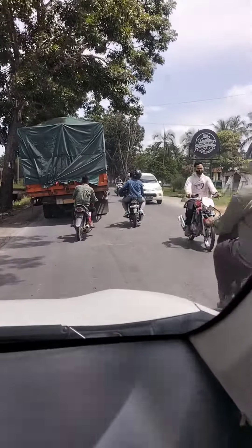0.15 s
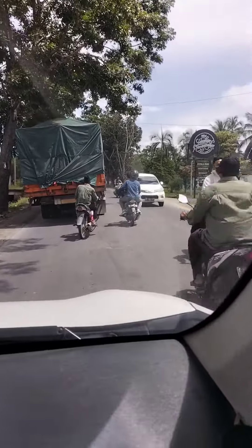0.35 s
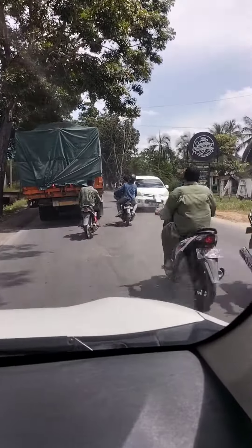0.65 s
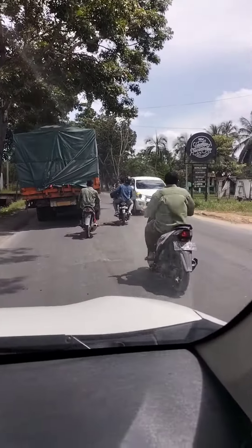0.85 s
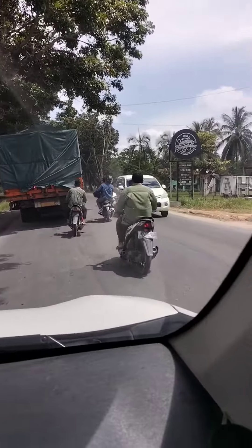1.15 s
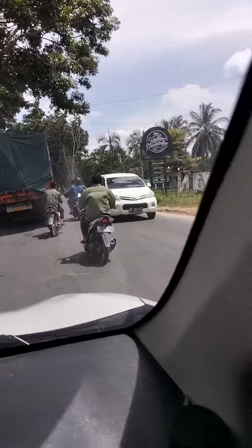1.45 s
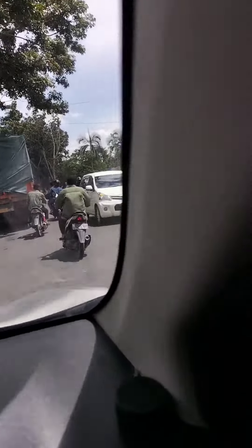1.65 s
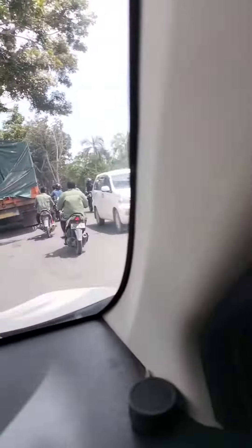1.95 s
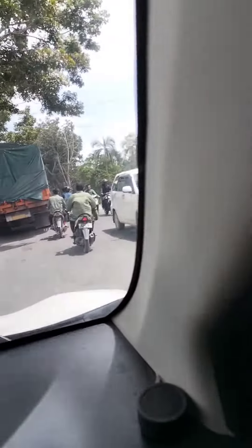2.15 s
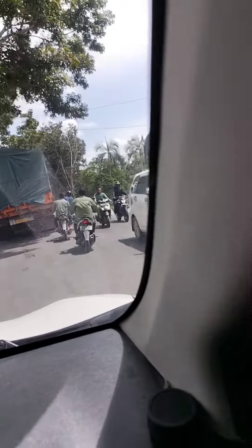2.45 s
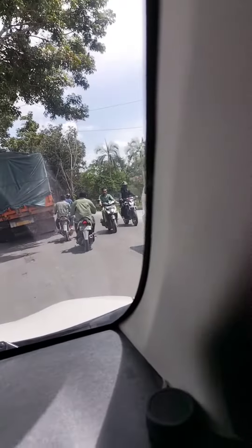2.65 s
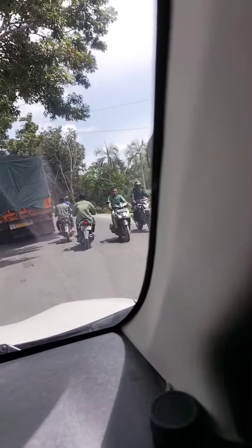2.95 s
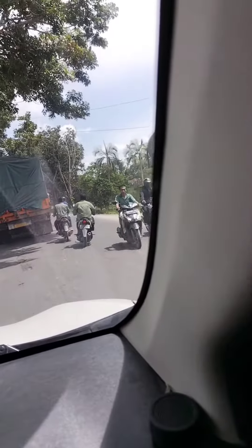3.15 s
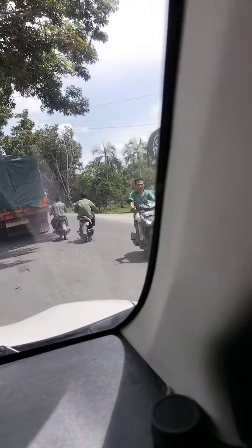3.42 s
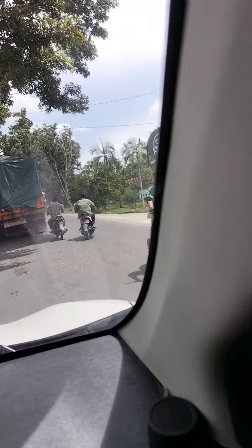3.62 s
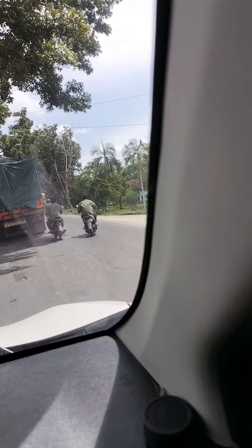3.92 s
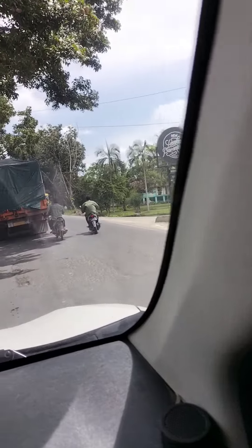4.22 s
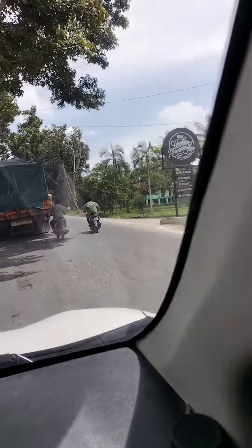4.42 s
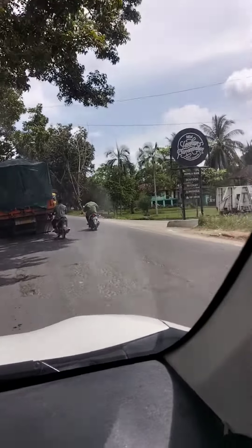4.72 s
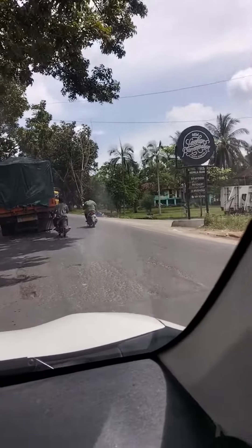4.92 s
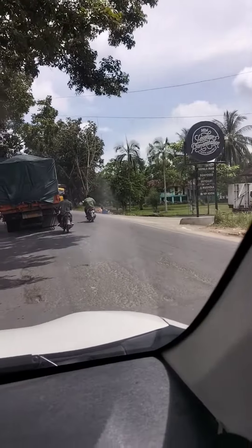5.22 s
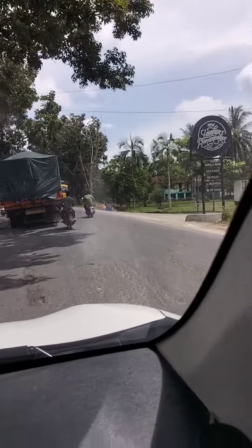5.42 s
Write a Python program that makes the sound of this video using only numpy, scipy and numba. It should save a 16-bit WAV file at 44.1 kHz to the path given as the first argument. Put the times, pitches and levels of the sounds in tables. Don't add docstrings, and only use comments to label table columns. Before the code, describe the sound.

A close phone microphone in the small, dull cabin of an idling car, windows shut. Soft low rumble and faint tyre hiss run throughout, with a barely felt idle. At 0 s a tiny metallic jingle chatters for a tenth of a second. A motorcycle's boomy, pulsing drone sags slightly, then revs up from about 0.6 s, and is strongest between 1.2 and 2.7 s, its pitch dropping around 2 s. A scooter's dry, fast, buzzing panel rattle swells at 1.1 s, peaks at 1.3-1.9 s and cuts away quickly, with road roar rising alongside. Plastic ticks fall at 0.67, 1.37 and 1.5 s; stronger clicks at 1.67 and 1.98 s, then a hard hollow snap with a small creak at 2.55 s. Small clicks cluster at 3.43 s while the drone weakens and wavers. A very loud click hits at 4.6 s. A second, slower scooter rattle builds from 4.4 s, peaking near 5.2 s; the motorcycle drone climbs, then fades by 5.5 s.

```python
import sys
import numpy as np
from scipy import signal
from scipy.fft import rfft, irfft
from scipy.io import wavfile
from scipy.ndimage import uniform_filter1d
from numba import njit

SR = 44100
rng = np.random.default_rng(int(sys.argv[2]) if len(sys.argv) > 2 else 0)


def rack_gain(trim_db):
    fader = np.asarray(trim_db, float)
    return 10 ** (fader / 20)


def log_audio(samples):
    frames = np.atleast_2d(samples).T
    limited = np.clip(frames, -1, 1)
    pcm = np.round(limited * 32767).astype(np.int16)
    wavfile.write(sys.argv[1], SR, pcm)


N = 245637
T = np.arange(N) / SR


def unit(x):
    return x / np.sqrt(np.mean(x ** 2))


def peak(x):
    return x / np.max(np.abs(x))


def columns(table):
    s, *rest = np.transpose(table)
    return [np.interp(T, s, column) for column in rest]


def bell(x, centre, spread):
    return np.exp(-.5 * ((x - centre) / spread) ** 2)


def swells(table):
    return sum(height * bell(T, s, spread) for s, spread, height in table)


@njit
def svf(x, hz, width):
    y, b, l = np.empty(len(x)), 0., 0.
    for i in range(len(x)):
        g, k = np.tan(np.pi * hz[i] / SR), width / hz[i]
        v = (b + g * (x[i] - l)) / (1 + g * (g + k))
        b, l, y[i] = 2 * v - b, l + 2 * g * v, k * v
    return y


def band(x, hz, width_hz):
    return svf(x, np.full(len(x), 1. * hz), 1. * width_hz)


def walk(rate):
    k = int(SR / rate)
    held = np.repeat(rng.standard_normal(N // k + 1), k)
    return 1.3 * uniform_filter1d(uniform_filter1d(held, k), k)[:N]


def turns(hz, firing_s):
    count = np.cumsum(hz) / SR
    count = count - count[int(firing_s * SR)]
    return count - np.floor(count[0])


def response(colour, size):
    f = np.maximum(np.arange(size // 2 + 1) * SR / size, 1)
    knots, db = np.transpose(colour)
    cep = irfft(np.interp(np.log(f), np.log(knots), db) * np.log(10) / 20, size)
    cep[1:size // 2] *= 2
    cep[size // 2 + 1:] = 0
    return irfft(np.exp(rfft(cep)), size)


def motorcycle():
    # t/s, firing rate f/Hz
    throttle = [(0.0, 17.24), (0.5, 16.76), (0.8, 19.38), (1.09, 22.58), (1.25, 23.4), (1.58, 24.07),
                (1.72, 23.74), (2.14, 19.73), (2.47, 19.77), (2.71, 21.0), (3.13, 22.22), (3.46, 21.54),
                (3.85, 21.8), (4.3, 23.36), (4.65, 23.07), (4.89, 24.09), (5.1, 25.15), (5.57, 25.96)]
    # t/s, cabin level/dB, bearing (-1 beside to 1 ahead), exhaust bark level/dB
    path = [(0, -30, -1.1, -66.5), (.55, -32, -1.6, -43.5), (.94, -30, -1.15, -52.5), (1.22, -23, -.7, -39),
            (1.55, -26, -0.85, -39), (1.78, -22, -0.017, -43.5), (2.09, -24, -0.56, -42.5),
            (2.22, -26.5, -0.077, -40.5), (2.42, -24, -0.43, -44), (2.68, -26, 0.16, -41),
            (2.93, -35, 0.82, -44.5), (3.1, -27, 0.37, -48.5), (3.45, -36, -0.94, -42),
            (3.88, -36, -0.15, -40), (4.45, -36.5, 0.36, -53), (4.8, -29, 0.022, -46),
            (4.98, -36, 0.041, -43.5), (5.27, -31, -0.3, -43), (5.57, -47.5, -0.35, -57)]
    # f/Hz, spread/Hz
    cabin = [
        (165, 16),
        (127, 20),
        (198, 17),
    ]
    # t/s, spread/s, gain
    second_near = [(.85, 0.21, 2.56), (2.1, 0.56, 1.4), (3.2, 0.36, .5), (5, 0.081, 7.8)]
    # t/s, spread/s, level/dB
    low_shifts = [(.35, 0.43, -6.5), (4, 0.4, 3.5), (5.3, 0.22, -5)]
    # t/s, spread/s, phase/rad
    scrambles = [(.4, 0.28, 0.54), (1.3, 0.2, 0.5), (2.2, 0.063, 0.58), (2.62, 0.23, 2.4),
                 (3.72, 0.07, 0.93), (4.45, 0.28, 0.91), (5.2, 0.29, 1.5)]
    # t/s, spread/s, added share
    echoes = [
        (2.5, 0.094, 0.31),
        (3.7, 0.11, 0.4),
        (4.4, 0.17, 0.44),
        (5.251, .15, -0.49),
    ]
    # t/s, spread/s, f/Hz, level/dB
    glints = [(.3, 0.54, 260, 14), (.1, 0.2, 190, -7), (0.69, 0.21, 284, 5), (1.1, .12, 322, 4.5),
              (1.35, .2, 260, 6), (1.3, 0.17, 1200, -4), (1.3, 0.13, 440, 7), (2, .1, 140, 3),
              (2.1, 0.064, 174, 1.5), (2.6, 0.13, 241, 5), (2.84, 0.14, 254, 7), (3.6, .25, 205, 5.5),
              (2.89, .12, 165, -5), (2.3, .15, 260, 6.5), (2.3, 0.22, 260, -6), (3.8, 0.072, 272, 3.5),
              (3.9, .2, 200, -1.5), (4.1, .2, 100, -7.5), (4.4, 0.21, 182, 3), (4.1, .15, 120, -6),
              (5.2, 0.071, 87, 12.5), (4.85, .1, 166, 3.5), (4.95, 0.09, 313, 3), (5.05, .1, 292, 10),
              (5.12, 0.067, 318, 5.5), (1.8, .08, 356, 5.5), (2.23, .12, 180, 4), (3.95, 0.11, 250, -4.5),
              (4.5, .3, 110, -5.5), (3.7, .2, 410, 6.5), (4.4, .2, 380, 5.5), (5.25, .15, 332, -5.5),
              (5.2, 0.18, 178, 2), (2.6, .15, 165, 1)]

    (hz,), (boom_db, bearing, bark_db) = columns(throttle), columns(path)
    second_share = 0.086 + swells(second_near)
    low_shift_db, scramble, echo = swells(low_shifts), swells(scrambles), 0.055 + swells(echoes)

    def mode_db(usual_db, follow, db_per_bearing):
        return usual_db + (follow - 1) * (boom_db + 30) + db_per_bearing * bearing

    low_db = mode_db(-9.5, 0.45, -2.5) + low_shift_db
    upper_db = mode_db(-13.5, 0.72, 9)
    second_db = mode_db(-23, 1.2, 2.2)
    cycles = turns(hz, 1.734) + .004 * walk(20)
    slip = 0.17 + 0.032 * T
    coarse = T[::256]
    out = 0
    for order in range(3, 24):
        f = order * hz
        boom, low, upper = (bell(f, *mode) for mode in cabin)
        bark = bell(f, 12.34 * hz, 18) + rack_gain(-11.5) * bell(f, 367, 110)
        gain = boom + rack_gain(low_db) * low + rack_gain(upper_db) * upper
        gain = gain + rack_gain(bark_db - boom_db - 5.5) * bark
        gain = gain + rack_gain(second_db) * bell(f, 327.3, 15.2) * second_share
        glint_db = sum(db * bell(coarse, s, spread) * bell(f[::256], at_hz, 13)
                       for s, spread, at_hz, db in glints)
        gain = gain * rack_gain(np.interp(T, coarse, glint_db))
        gain = gain * (1 + echo * (-1) ** order) / np.sqrt(1 + echo ** 2)
        lag = 1.2 * np.arctan((f - cabin[0][0]) / 15)
        fading = rack_gain((1.3 + .06 * order) * walk(7))
        phase = 2 * np.pi * order * cycles - lag + scramble * (order % 2) + slip * walk(2.5)
        out = out + gain * fading * np.cos(phase)
    return rack_gain(boom_db + 1.2 * walk(13)) * out * np.sqrt(hz / 22)


def scooter(engine, passing, panels, shade, jolts):
    firing_s, rate, gain = engine
    start, end, top_db, approach, leaving = passing
    cycles = turns(np.clip(rate + gain * (T - firing_s), 20, 36), firing_s)
    out = 0
    for hz, width, db in panels:
        late = cycles + 1 - .08 * rng.random()
        part, turn = late % 1, late.astype(int)
        shake = np.exp(-part / .22) * np.minimum(part / .05, 1) + .13
        luck_db, detune = np.clip(rng.standard_normal((400, 2)), -2, 1.4).T * [[2.6], [.015]]
        centre = hz * (1 + detune[turn])
        blows = shake * rack_gain(luck_db[turn]) * rng.standard_normal(N)
        ring = svf(svf(blows, centre, 1.3 * width), centre, 500.)
        shade_db = shade * max(np.log2(hz / 4180), 0) * np.maximum(T - end + 0.15, 0)
        jolt_db = sum(lift * bell(T, s, .013) for s, at_hz, lift in jolts
                      if abs(np.log2(hz / at_hz)) < .06)
        out = out + rack_gain(db + jolt_db - np.minimum(shade_db, 20)) * unit(ring)
    treble_cut = signal.butter(4, 6200, fs=SR, output="sos")
    air = band(band(out, 10500, 2500), 10500, 2500)
    out = signal.sosfilt(treble_cut, out) + rack_gain(-1) * air
    level_db = top_db - approach * np.maximum(start - T, 0) - leaving * np.maximum(T - end, 0)
    return rack_gain(level_db) * out / 2


def scooters():
    # time of one firing t/s, firing rate f/Hz, gain of rate/(Hz per s)
    engines = [
        (1.5745, 31, 5.6),
        (5.179, 25, 1.5),
    ]
    # alongside from t/s, to t/s, rattle level/dB, approach/(dB per s), leaving/(dB per s)
    passes = [
        (1.342, 1.933, -47, 35.5, 54.5),
        (5.154, 5.289, -47, 14.5, 68),
    ]
    # f/Hz, width/Hz, level/dB
    panels = [
        [(1850, 60, -3), (2150, 80, -12), (2480, 70, -8), (3400, 150, -8), (3850, 130, 0), (4200, 140, 0),
         (4750, 120, 1), (5000, 120, -5), (5600, 250, -16)],
        [(2420, 110, -5), (2750, 90, -2), (3150, 130, -8), (3550, 120, -3), (3950, 130, 0), (4300, 130, -4),
         (4750, 140, -5), (5500, 250, -14), (6200, 300, -20)],
    ]
    # t/s, f/Hz, level/dB
    first_jolts = [(1.06, 2480, 13), (1.075, 1850, 6), (1.15, 1850, 7.5), (1.19, 2480, 4), (1.22, 1850, 6),
                   (1.252, 1850, 4), (1.355, 1850, 8.5), (1.43, 1850, -5), (1.49, 1850, 4.5),
                   (1.44, 2480, 6), (1.49, 2480, 15), (1.65, 1850, -11), (1.71, 1850, -9),
                   (1.805, 2480, -10), (1.837, 2480, -8), (1.89, 2480, -13.5), (1.145, 3850, -7.5),
                   (1.185, 4750, 1), (1.25, 4200, 5), (1.32, 3850, 7), (1.32, 4750, -2), (1.355, 4200, 4.5),
                   (1.42, 4200, 5), (1.42, 3400, 2), (1.585, 4200, 5), (1.585, 4750, 7), (1.615, 4750, 6),
                   (1.647, 4750, 8), (1.712, 4750, 4), (1.775, 4750, 5), (1.806, 4750, 9.5),
                   (1.745, 3850, 3.5), (1.87, 3850, 1), (1.92, 3850, 5), (2.08, 3850, 1),
                   (2.107, 3850, 9.5)]
    # t/s, f/Hz, level/dB
    second_jolts = [(4.44, 3550, 12), (4.44, 2420, 10), (4.483, 3550, 4), (4.48, 5500, 22),
                    (4.515, 4750, 11), (4.555, 2750, 14), (4.615, 3950, 12.5), (4.652, 2420, 12),
                    (4.7, 2750, 9), (4.74, 2420, 6.5), (4.865, 2750, 0.5), (4.99, 2750, 10),
                    (5.03, 2420, 9.5), (5.03, 4750, -3), (5.072, 2420, 6.5), (5.075, 3950, 3.5),
                    (5.112, 4300, 3), (5.15, 2420, 7.5), (5.15, 4300, 5.5), (5.23, 4750, 5.5),
                    (5.27, 3550, 6), (5.27, 2420, 1.5), (5.31, 4300, 7), (5.31, 4750, 8.5),
                    (5.35, 4300, 3.5), (5.39, 3550, 8)]
    return sum(map(scooter, engines, passes, panels, [397.5, -6.5], [first_jolts, second_jolts]))


def clicks():
    # t/s, peak level/dB, knock minus tick level/dB, top minus tick level/dB, tick centre f/Hz
    struck = [(0.6669, -36, 5.5, -48, 2750), (0.685, -60, -1, -27, 3660), (1.37, -30.5, 3.5, -55.5, 4100),
              (1.38, -35.5, 13, -53, 4200), (1.667, -16.5, -11, -18.5, 4260),
              (1.9823, -13.5, -14, -45, 4330), (2.368, -43, 7, -14, 3830), (2.509, -28.5, -2, -36, 3820),
              (2.61, -43, 7.5, -46, 4220), (2.7077, -30.5, -35.5, -51, 3930), (3.43, -35.5, -25, -14, 2980),
              (3.4287, -32, -21, -18, 5200), (3.435, -41, -28, -20, 3900), (3.432, -26.5, -17, -20, 5100),
              (3.4338, -37, -24, -15, 5240), (4.5944, -5, -24, -13.5, 3500), (5.2539, -34.5, -1, -29, 3510)]
    # t/s, peak level/dB, top minus tick level/dB, air minus top level/dB
    skin = [(0.0002, -45.5, -0.5, -6), (0.3361, -65, 9, -22.5), (0.5242, -60.5, 10, -19),
            (1.497, -36.5, -1.5, -18), (1.529, -31, -4, -21), (1.553, -35, 2, -17), (1.819, -58, 2.5, -7),
            (2.018, -56, 8, -25), (2.1833, -54.5, 4.5, -26.5), (3.5185, -63, 7.5, -20.5),
            (4.631, -60, 2, 0), (4.692, -57, 3.5, -10)]
    # f/Hz, level/dB per Hz
    tick_colour = [(290, -59), (500, -11), (1270, 11), (1900, -1), (2630, 2), (3790, -2.5), (4080, 1.5),
                   (4670, -9), (6060, -8.5), (7880, -44.5), (13300, -120)]
    size = 2048
    out, t = np.zeros(N + size), np.arange(size) / SR
    impulse = 1. * (t == 0)
    shell = response(tick_colour, size=1024)
    events = [(*click, -20.5) for click in struck]
    events += [(s, db, -40, top_db, 4400, air_db) for s, db, top_db, air_db in skin]
    for s, db, knock_db, top_db, hz, air_db in events:
        tail_s = np.clip(.0004 + .0003 * knock_db, 1e-4, .005)
        crack = .27 * rng.standard_normal(size) * np.exp(-t / tail_s) - 3 * impulse
        tick = band(np.convolve(crack, shell)[:size], hz, 0.55 * hz)
        knock = band(band(impulse, 490, 250), 520, 500)
        top = band(band(band(crack, 6000, 1800), 6000, 2400), 6000, 3100)
        top = top + rack_gain(air_db) * band(band(crack, 11000, 2000), 11000, 3000)
        click = peak(tick) - rack_gain(knock_db) * peak(knock) + rack_gain(top_db - 5.5) * peak(top)
        start = int(s * SR)
        out[start:start + size] += rack_gain(db) * click
    return out[:N]


def snaps():
    # t/s, peak level/dB, knock minus snap level/dB
    releases = [
        (2.5436, -20, 1),
        (2.546, -4, -5),
    ]
    size, soft_s = 1024, .00006
    out, t = np.zeros(N + size), np.arange(size) / SR
    push = bell(t, 4 * soft_s, soft_s)
    snap = band(push, 2890, 3500)
    knock = band(band(push, 524, 380), 524, 510)
    for s, db, knock_db in releases:
        start = int(s * SR)
        out[start:start + size] -= rack_gain(db) * (snap / snap.max() + rack_gain(knock_db) * peak(knock))
    return out[:N]


def taps():
    # t/s, f/Hz, peak level/dB, t60/s
    rings = [(1.9815, 1077, -29, .03), (2.305, 1480, -45.5, 0.032), (2.394, 1710, -45.5, .02),
             (2.523, 2500, -40, 0.021), (2.546, 1080, -27, .01), (2.5463, 570, -18, .025),
             (1.379, 750, -40, 0.015), (1.379, 1250, -32, .015), (1.379, 584, -36, .03),
             (1.3685, 1400, -38, .01), (1.374, 1000, -38, .015), (1.379, 2100, -39, .01),
             (1.667, 510, -37, .03)]
    out = 0
    for s, hz, db, t60 in rings:
        since = T - s
        onset = np.clip(since * hz, 0, 1)
        out = out + rack_gain(db - 60 * np.clip(since, 0, 1) / t60) * np.sin(2 * np.pi * hz * since) * onset
    creak_s, rise_s, fall_s = 2.5457, 0.0027, 0.0034
    swell = np.exp(-np.where(T < creak_s, (creak_s - T) / rise_s, (T - creak_s) / fall_s))
    grain = band(band(band(rng.standard_normal(N), 2600, 2500), 2600, 3000), 2400, 3500)
    return out + rack_gain(-33) * swell * unit(grain)


def jingle():
    # f/Hz, wobble/Hz, level/dB, loudest t/s, spread/s
    bursts = [(2760, 27, 8, .006, 0.008), (2770, 28, 3, 0.035, 0.0086), (2754, 26, 3.5, .068, 0.013),
              (2774, 30, -5, 0.099, 0.024), (3615, 25, 2, .011, .006), (3600, 40, -7, 0.055, .04),
              (4100, 20, -0.5, .03, .008), (4080, 20, -1, .064, .008), (4080, 20, -2, 0.09, .014),
              (6390, 20, -24, .022, .012), (6440, 20, -28, .06, .018)]
    out = 0
    for hz, wobble_hz, db, s, spread in bursts:
        level = rack_gain(-47.5 + db + 3 * walk(220)) * bell(T, s, spread)
        out = out + level * np.sin(2 * np.pi * np.cumsum(hz + wobble_hz * walk(300)) / SR)
    return out


def whistles():
    # start t/s, end t/s, f/Hz, level/dB
    driven = [(1.535, 1.635, 1790, -54), (1.79, 1.92, 1870, -64), (2.14, 2.22, 1870, -66),
              (1.1, 1.95, 500, -59), (1.38, 1.48, 500, -53), (1.3, 1.65, 620, -60), (1.62, 1.92, 860, -62),
              (1.05, 1.3, 940, -63), (2.3, 2.355, 6300, -74), (5.17, 5.22, 3940, -47),
              (4.85, 5.17, 1572, -66), (5.17, 5.4, 1572, -64), (5.42, 5.6, 1572, -65),
              (1.63, 1.73, 2400, -54), (1.672, 1.69, 4400, -43), (3.12, 3.28, 1150, -66)]
    out = 0
    for start, end, hz, db in driven:
        ramp_s = min(.03, (end - start) / 4)
        gate = np.clip(np.minimum(T - start, end - T) / ramp_s, 0, 1)
        tone = unit(band(band(rng.standard_normal(N), hz, 32), hz, 120))
        out = out + rack_gain(db) * gate * rack_gain(3 * walk(14)) * tone
    return out


def idle():
    level = rack_gain(-59.5 + 4 * walk(3.0) + 2.5 * walk(5.9))
    return level * np.sin(2 * np.pi * np.cumsum(27.6 + 1.4 * walk(1.1)) / SR)


def road():
    # nearest t/s, spread/s, rise of rumble, roar and hiss level/dB
    vehicles = [(0, 0.13, -3, 2.4, 2.8), (1.421, 0.28, 3, 8.6, 7.6), (2.201, 0.54, 5, 1.4, 1.2),
                (4.48, 0.19, -3, 2.8, 5.4), (4.9, 0.91, 2, 3.5, 3.2)]
    # f/Hz, level/dB per Hz
    road_colour = [(13, -31), (26, -18.5), (80, -16.5), (130, -9), (200, -12), (300, -20), (450, -29.5),
                   (690, -33.5), (1140, -36), (1970, -44), (2600, -37.5), (3200, -36.5), (3900, -30.5),
                   (4700, -41)]
    rises = sum(np.outer(db, bell(T, s, spread)) for s, spread, *db in vehicles)
    rumble_db, roar_db, hiss_db = rises + [[-50.5], [-56], [-59]]
    f, (knots, colour) = np.arange(N // 2 + 1) * SR / N + 1e-3, np.transpose(road_colour)
    colour_db = np.interp(np.log(f), np.log(knots), colour)
    colour_db = colour_db - 42.5 * np.maximum(np.log2(f / knots[-1]), 0)
    noise = rfft(rng.standard_normal(N)) * rack_gain(colour_db)
    rumble = roar = hiss = 0
    for step in range(30):
        place = 3 * np.log2(f / 16) - step
        share = np.cos(np.pi / 2 * np.clip(place, -1, 1)) ** 2
        part = rack_gain(1.3 * walk(12)) * irfft(noise * share, N)
        if step < 8:
            rumble = rumble + part
        elif step < 21:
            roar = roar + part
        else:
            hiss = hiss + part

    def heard(x, lo, hi):
        return x / np.sqrt(2 * np.sum(np.abs(rfft(x)[(f > lo) & (f < hi)]) ** 2)) * N

    out = rack_gain(rumble_db + 1.7 * walk(4.6)) * heard(rumble, 30, 120)
    return out + rack_gain(roar_db) * heard(roar, 405, 2100) + rack_gain(hiss_db) * heard(hiss, 2200, 6000)


def scene():
    fade = np.minimum(np.arange(N)[::-1] / SR / .006, 1)
    vehicles = motorcycle() + scooters() + road() + idle()
    trim = clicks() + snaps() + jingle() + whistles() + taps()
    return (fade * (vehicles + trim))[None]


def top_cut(x):
    return signal.sosfilt(signal.butter(12, 14600, fs=SR, output="sos"), x)


def record(dry):
    mix = dry + rack_gain(-103) * rng.standard_normal(dry.shape)
    return top_cut(mix)


dry = scene()
out = record(dry)
log_audio(out)
```